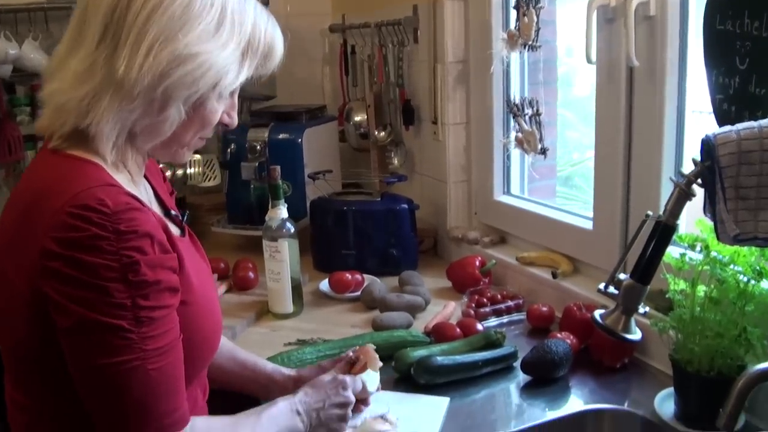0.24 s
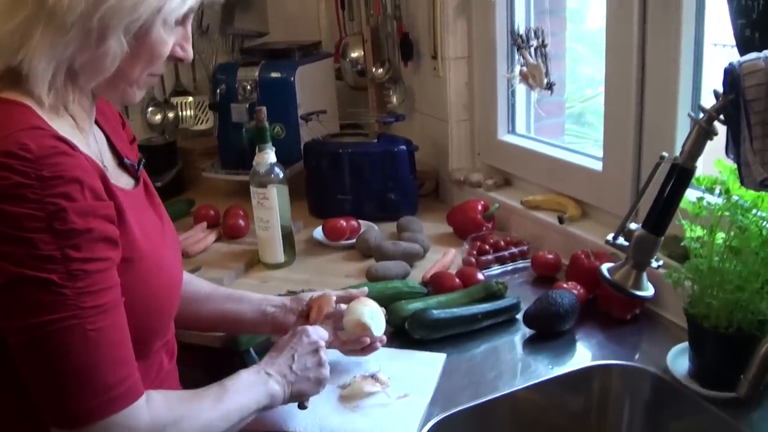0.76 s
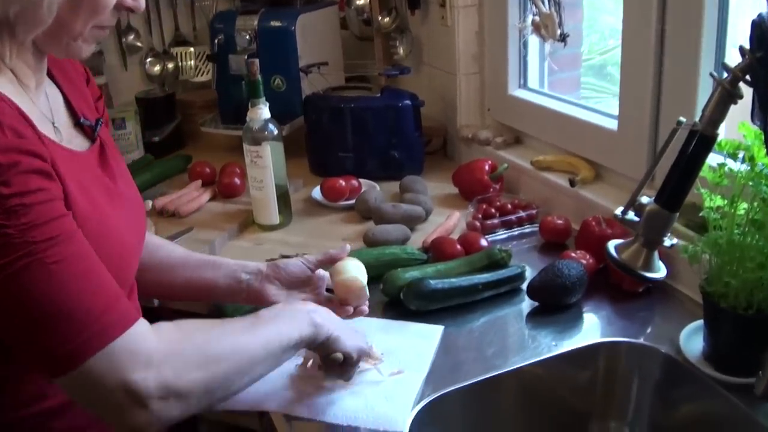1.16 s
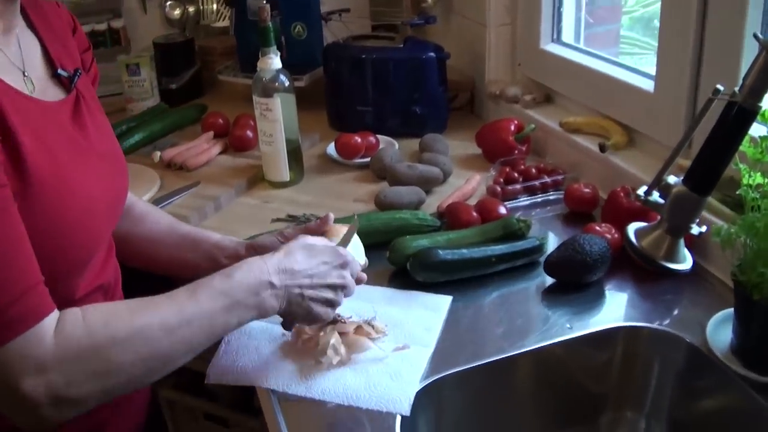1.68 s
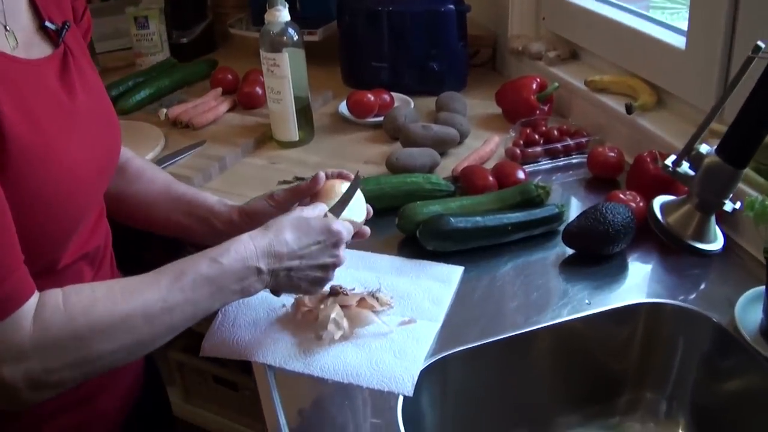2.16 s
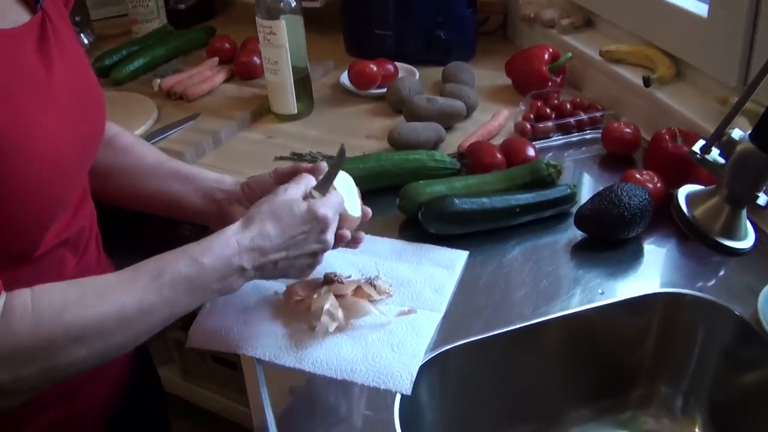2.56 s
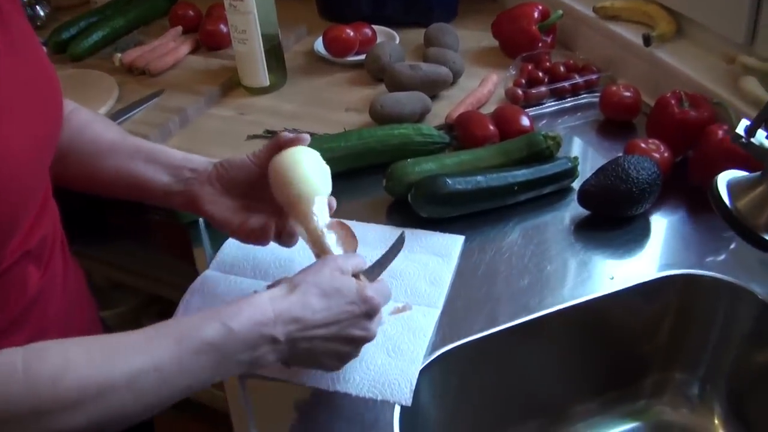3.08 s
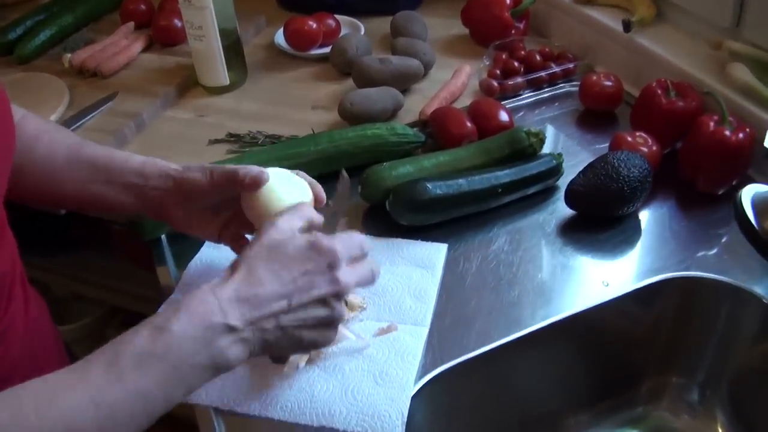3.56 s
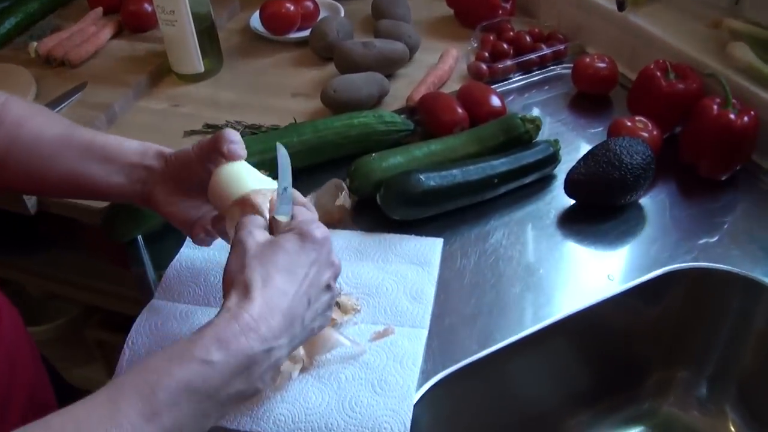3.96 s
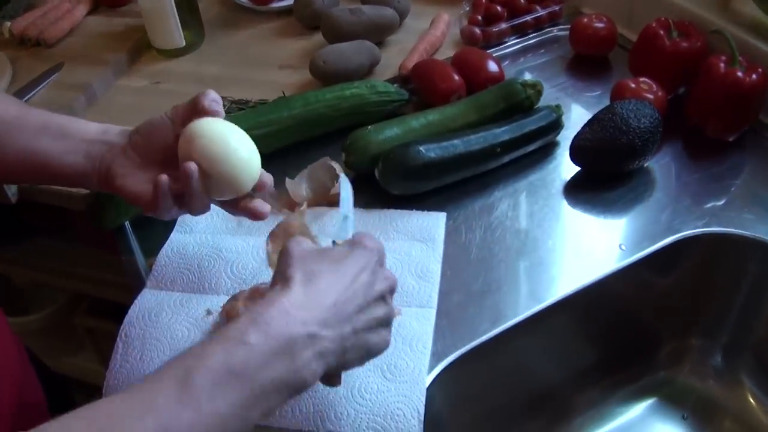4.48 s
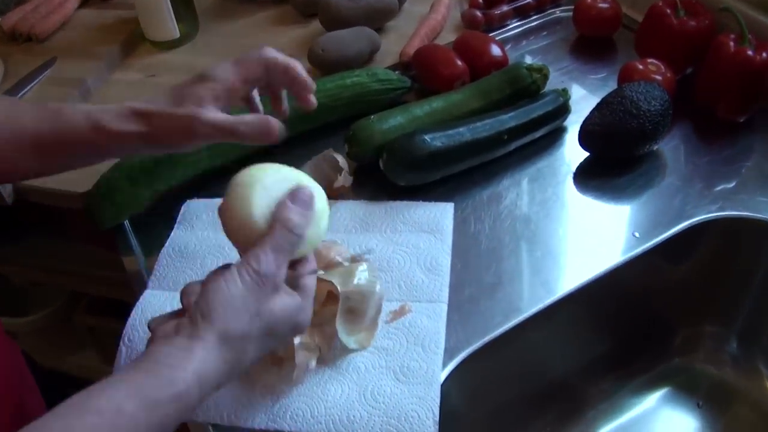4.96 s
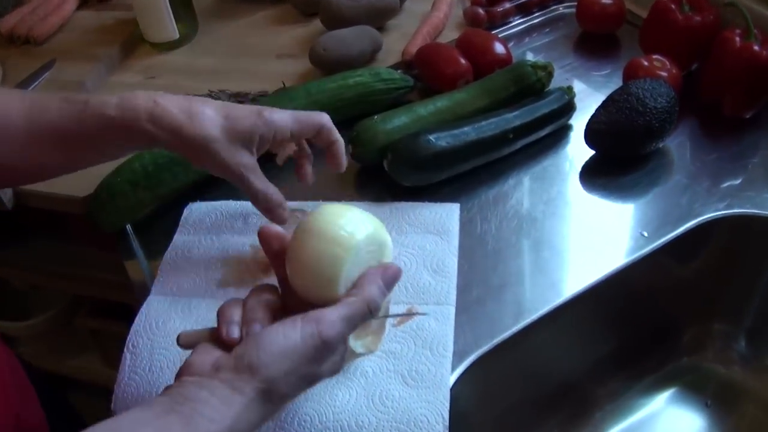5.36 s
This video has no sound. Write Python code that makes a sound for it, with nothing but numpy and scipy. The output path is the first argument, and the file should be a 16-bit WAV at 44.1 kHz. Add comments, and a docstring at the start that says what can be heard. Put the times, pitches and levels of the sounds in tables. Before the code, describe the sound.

Dry, papery onion skin crackles and tears close up in bursts, with sharp little snaps, quiet gaps, and a soft late knock on the worktop.

```python
"""Close to the microphone in a small tiled kitchen, over room rumble, hiss and blurred appliance hums,
dry onion skin tears at once: snaps that ring briefly and free fine crackle, over a papery fibre rustle.
It thins to faint rustling after about 1.4 s, returns loudest between 2.3 and 3.4 s, then thins again.
At 5.2 s a soft bouncing knock sounds the worktop as decaying modes, among the last few snaps.
Sparse echoes from tiles and steel follow the skin and the knock."""
import sys
import numpy as np
from scipy import signal
from scipy.fft import rfft, irfft
from scipy.io import wavfile
from scipy.ndimage import uniform_filter1d

SR = 44100
rng = np.random.default_rng(int(sys.argv[2]) if len(sys.argv) > 2 else 0)


def how_loud(loudness_db):
    """Turn decibels into a plain amplitude multiplier (0 dB gives 1, 20 dB gives 10)."""
    steps = np.asarray(loudness_db, float) / 20
    return 10 ** steps


def int16_out(signal):
    """Quantize to a 16-bit WAV file."""
    q = np.round(np.clip(np.atleast_2d(signal).T, -1, 1) * 32767)
    wavfile.write(sys.argv[1], SR, q.astype(np.int16))


N = 248091  # length in samples

# spectrum of the room rumble and hiss: pitch_hz, density_db (per Hz, relative)
ROOM_AIR = [(12, -6), (20, 4.5), (113, -8.5), (187, -11.5), (255, -23.5), (337, -20), (718, -23),
            (825, -21.5), (1400, -28.5), (2320, -28), (5530, -32.5), (11100, -30.5), (16000, -30)]
# drift of the two appliance hums: time_s, low_hum_db, high_hum_db
HUM_DRIFT = [(0.0, -83, -83), (0.36, -59.5, -54), (0.95, -62.5, -68), (1.66, -69.5, -77), (2.24, -76, -81),
             (2.84, -65.5, -80), (3.35, -64, -102), (3.93, -72, -72.5), (4.89, -66.5, -65.5),
             (5.14, -70.5, -65.5), (5.63, -71, -78.5)]
# pitch of the low and the high hum: pitch_hz, width_hz
HUM_PITCH = [(260, 32), (495, 48)]
# spectrum of the hiss and rumble unlike in the two channels: pitch_hz, density_db (per Hz, relative)
CHANNEL_HISS = [(12, -39), (20, -5), (248, -8), (285, -12), (410, -6.5), (499, -14), (7950, -16),
                (16000, -12.5)]
# decay of the kitchen echoes: pitch_hz, t60_s
KITCHEN_DECAY = [(200, 0.071), (1000, 0.68), (4000, 0.17), (12000, 0.16)]
# contacts of the bouncing knock: start_s, level_db (scales all the modes)
KNOCKS = [(5.167, -38.5), (5.185, -40.5), (5.211, -42)]
# modes of worktop and sink: pitch_hz, level_db (re the knock), t60_s
WORKTOP_MODES = [(109.5, 1.5, 0.28), (134, -1, 0.3), (183, 0, 0.27), (278, -8, 0.24), (356, -6, 0.21),
                 (436, 5, 0.07), (474, -8.5, 0.33), (616, -16, 0.17), (773, -16, 0.18), (1210, -29.5, 0.28)]
# tugs at the skin, each swelling and dying away:
# peak_s, rise_db_per_s, rustle_db, fall_db_per_s, brightness_db_per_octave, hollowness_db
SKIN_TUGS = [(.003, 2000, -28.5, 167, -2, -3), (.061, 3004, -30.5, 198, -0.5, -12),
             (.107, 2500, -34, 170, -1, -9), (0.191, 294, -23.5, 195, -3, -29),
             (.27, 600, -37.5, 100, -2.5, 1), (.347, 3000, -34, 150, 4, -4),
             (.429, 3000, -33, 218, 2.5, -1), (0.461, 3000, -37, 140, 0, 4),
             (.612, 900, -29.5, 130, 0, -6.5), (0.715, 500, -43, 76, -3.5, 3.5),
             (0.978, 1496, -36, 131, -3, -22), (1.084, 350, -41.5, 195, -4.5, 0),
             (1.235, 345, -43, 65, -2, 3), (1.34, 150, -44.5, 90, -2.5, -13), (1.44, 150, -57, 62, -2, -11),
             (2.207, 2500, -50.5, 64, 3, 7), (2.314, 3000, -32.5, 184, -1, -9),
             (2.436, 3000, -38, 27, -0.5, -30), (2.547, 1500, -34, 56, -4.5, -20),
             (2.665, 2002, -26.5, 180, 6.5, -3.5), (2.744, 800, -26, 141, -1, 4.5),
             (2.79, 3000, -31, 205, -1.5, 0.5), (2.916, 400, -27.5, 280, 2.5, 0.5),
             (2.944, 3000, -28, 218, -2, -4.5), (3.054, 3000, -51, 170, 13, -5),
             (3.137, 134, -37.5, 167, 0, 0), (3.228, 3000, -43, 277, 1, 0),
             (3.273, 1499.5, -40, 147, 2.5, 6), (3.341, 2999.5, -43.5, 158, 6, 9),
             (3.573, 896, -49.5, 65, -1, 7), (3.673, 136, -43, 135, -0.5, 3.5),
             (3.86, 200, -55, 51, -5.5, 2), (4.03, 55, -52.5, 79, -2.5, -18),
             (4.255, 450, -56.5, 29.5, -5, -16), (4.371, 146, -37, 320, -3, -3.5),
             (4.505, 800, -66, 22, -17, 0), (4.603, 145, -48.5, 179, 1, 12.5),
             (4.685, 296, -64.5, 120, -2, 6), (4.87, 202, -66.5, 46, -11, -9),
             (5.232, 350, -39.5, 280, -1.5, -7), (5.34, 3000, -50.5, 170, 7, -9),
             (5.4, 2000, -63.5, 77, -13, -9), (5.46, 201, -56.5, 496, -2, -7), (5.559, 2500, -62, 62, 0, 6)]
# spectrum of the rustle: pitch_hz, density_db (per Hz, relative)
SKIN_SPECTRUM = [(88, -38), (150, -33), (354, -24.5), (702, -4.5), (1170, -12.5), (1760, -5), (2760, -10.5),
                 (3420, -0.5), (4080, 1), (11700, 5), (16000, 3.5)]
# steady peaks in the colour of the rustle: pitch_hz, width_hz, level_db (before the hollowness of the tug)
RUSTLE_PEAKS = [(2270, 690, 4.5), (3250, 100, 6.5), (4850, 120, -1)]
# the clearest cracks: start_s, peak_db, flake_pitch_hz, low_push_db (re peak),
# crackle_db (re peak, before the trims in snaps)
CLEAR_SNAPS = [(0.0184, -12.5, 3540, -19.5, -15.5), (0.0583, -8.5, 8570, -20, -18),
               (0.0942, -17.5, 6660, -30, -24), (0.1037, -9.5, 14070, -22, -15.5),
               (0.1486, -15, 9800, -18.5, -21), (0.1584, -13.5, 3600, -20, -12),
               (0.172, -10.5, 12200, -21, -12), (0.1764, -14.5, 12100, -32, -14),
               (0.1864, -8, 6150, -20, -28), (0.2134, -13.5, 7400, -25, -8),
               (0.2254, -10.5, 5900, -14.5, -21), (0.2593, -24.5, 4880, -32, -12),
               (0.2698, -17, 5550, -37, -15), (0.2857, -10.5, 4950, -38, -20),
               (0.3052, -12.5, 5900, -20, -23.5), (0.3441, -8, 5100, -13, -29),
               (0.3534, -14, 13900, -11, -29), (0.3704, -15, 6350, -12, -16),
               (0.3785, -13, 3660, -29, -18.5), (0.4264, -10.5, 4830, -17.5, -25),
               (0.4569, -11, 6970, -16, -16), (0.4668, -12, 12000, -17.5, -19.5),
               (0.4983, -15, 15100, -24, -20.5), (0.5935, -13, 6100, -28, -19),
               (0.6055, -11, 8600, -20.5, -16), (0.6104, -32.5, 12700, -16, 2),
               (0.6534, -12, 13060, -18.5, -16), (0.6739, -19, 2150, -17, -22),
               (0.7128, -22, 2200, -12.5, -9.5), (0.7554, -26, 2120, -14, -13.5),
               (0.9684, -21, 6970, -22, -28), (0.9757, -10, 4840, -23.5, -25),
               (1.0465, -23, 9300, -11, -26), (1.0765, -29.5, 3620, -13, -7), (1.2261, -33, 3470, -31, -28),
               (1.2376, -18.5, 3800, -29, -36), (1.284, -28.5, 7080, -11, -10.5),
               (1.3583, -32, 4250, -36, -34), (1.8173, -33.5, 1870, -21, -18), (1.941, -37, 8060, -32, -15),
               (2.14, -44.5, 1810, -12, -19), (2.1964, -40, 2100, -17, -14),
               (2.2059, -29.5, 12100, -29, -28), (2.2199, -30, 11700, -26.5, -11.5),
               (2.2653, -27.5, 1950, -18, -19.5), (2.2732, -27.5, 1900, -25, -24),
               (2.3082, -18, 14900, -15, -8), (2.3211, -19.5, 1880, -21, -15),
               (2.4344, -20, 5700, -27, -23.5), (2.4907, -23.5, 4290, -48, -8),
               (2.5436, -12, 5000, -42, -27), (2.5591, -15, 4900, -30, -7), (2.5795, -19, 4460, -39, -5.5),
               (2.599, -16, 5910, -36, -13.5), (2.6334, -12.5, 5700, -27, -16),
               (2.6474, -13, 5770, -27, -14.5), (2.6653, -7.5, 11700, -14, -12.5),
               (2.6974, -17, 12300, -30, -12), (2.7354, -11.5, 6250, -17, -17),
               (2.7427, -9.5, 3570, -13.5, -24.5), (2.7896, -2.5, 6200, -45, -24),
               (2.8104, -17.5, 8200, -26, -9), (2.8948, -7.5, 5860, -12, -21),
               (2.9158, -6, 16100, -19, -20.5), (2.9422, -6, 8240, -16, -14.5),
               (2.9464, -5, 13300, -12.5, -20), (3.0525, -21.5, 13400, -17, -18),
               (3.0844, -22, 6300, -26, -17), (3.0989, -30, 12500, -18, -29),
               (3.1323, -22.5, 8270, -33, -13.5), (3.1702, -24, 11300, -20, -22),
               (3.2261, -19, 3230, -27, -19), (3.27, -25, 7900, -29, -11), (3.2799, -21, 14900, -36, -10.5),
               (3.2904, -25.5, 2130, -18, -16), (3.3388, -15.5, 14800, -17, -20.5),
               (3.3892, -35, 12500, -38, -10), (3.5683, -34, 3240, -32, -9),
               (3.8057, -33.5, 4370, -24, -28), (3.8804, -40, 2420, -25, -16),
               (4.0726, -36.5, 2920, -13, -27), (4.1066, -36.5, 7550, -28, -39),
               (4.3256, -22.5, 4240, -18, -26), (4.361, -21.5, 2070, -15, -13),
               (4.3884, -31, 1750, -28, -33), (4.6029, -21.5, 7140, -23, -19),
               (4.6844, -38, 3500, -17, -19), (5.1941, -27.5, 1770, -18, -15.5),
               (5.227, -19, 4530, -24, -19.5), (5.2989, -31.5, 1950, -22, -27),
               (5.3393, -21, 6800, -13.5, -19.5), (5.3971, -26.5, 4420, -18.5, -21.5),
               (5.5707, -41.5, 3630, -18, -12.5)]


def evened(x):
    """Scales to rms 1."""
    return x / np.sqrt(np.mean(x ** 2) + 1e-20)


def read(points, hz):
    """Looks up a table by pitch on a log-frequency axis."""
    f, value = np.transpose(points)
    return np.interp(np.log(hz + 1), np.log(f + 1), value)


def add(mix, start_s, sound):
    """Mixes a sound in at start_s, cut off at the end of the mix."""
    part = mix[max(round(start_s * SR), 0):][:len(sound)]
    part += sound[:len(part)]


def coloured_noise(points):
    """White noise filtered to the spectrum of a table."""
    size = 2 ** 18
    spectrum = rfft(rng.standard_normal(N), size)
    return irfft(spectrum * how_loud(read(points, np.fft.rfftfreq(size, 1 / SR))))[:N]


def resonate(x, hz, width_hz):
    """A resonance of gain 1: shifts pitch hz down to zero, smooths, and shifts back."""
    turn = np.exp(2j * np.pi * np.cumsum(hz * np.ones(len(x))) / SR)
    r = np.exp(-np.pi * width_hz / SR)
    return 2 * (turn * signal.lfilter([1 - r], [1, -r], x / turn)).real


def background():
    """Room rumble and hiss as shaped noise, with two appliance hums as narrow noise that come and go."""
    out = how_loud(-58) * evened(coloured_noise(ROOM_AIR))
    time_s, *levels = np.transpose(HUM_DRIFT)
    for (hz, width_hz), level_db in zip(HUM_PITCH, levels):
        hum = evened(resonate(rng.standard_normal(N), hz, width_hz))
        out += how_loud(np.interp(np.arange(N) / SR, time_s, level_db)) * hum
    return out


def kitchen(x):
    """Sparse echoes of random sign from tiles and steel, each band dying at its own speed."""
    taps = np.zeros(SR // 2)
    at = np.arange(120, len(taps) - 20, 20)  # one echo in every 20 samples
    taps[at + rng.integers(0, 20, len(at))] = rng.choice([-1., 1.], len(at))
    hz, t, bands = signal.stft(taps, SR, nperseg=128)
    decay = how_loud(-60 * t / read(KITCHEN_DECAY, hz)[:, None])
    tail = signal.istft(bands * decay, SR, nperseg=128)[1]
    return signal.oaconvolve(x, tail / np.linalg.norm(tail))[:N]


def bump():
    """A soft bouncing knock sets worktop and sink modes sounding, with a dull scuff from the first contact."""
    out, t = np.zeros(N), np.arange(SR // 2) / SR
    phases = rng.random((len(KNOCKS), len(WORKTOP_MODES)))
    for (start_s, level_db), phase in zip(KNOCKS, phases):
        modes = np.zeros(len(t))
        for (hz, mode_db, t60_s), p in zip(WORKTOP_MODES, phase):
            modes += how_loud(mode_db - 60 * t / t60_s) * np.sin(2 * np.pi * (hz * t + p))
        soft_start = 1 - np.exp(-t / 0.0019)
        add(out, start_s, how_loud(level_db) * modes * soft_start)
    # a dull scuffing noise starts with the first contact and dies away
    scuff = evened(coloured_noise([(80, -20), (200, 1), (700, -5.5), (2500, -24), (8000, -39)]))
    add(out, KNOCKS[0][0], how_loud(-42.5 - 60 * t / 0.47) * scuff[:len(t)])
    return out


def pulls():
    """Rustle level, brightness and hollowness: tug powers add, the colour is their power-weighted average."""
    peak_s, rise, rustle_db, fall, bright_db, hollow_db = np.transpose(SKIN_TUGS)[:, :, None]
    since = np.arange(0, N + 32, 32) / SR - peak_s  # one point every 32 samples
    slope = np.where(since < 0, rise, fall)
    power = how_loud(rustle_db - abs(since * slope)) ** 2 + 1e-30
    total = power.sum(0)
    curves = [10 * np.log10(total)]
    curves += [(power * colour).sum(0) / total for colour in (bright_db, hollow_db)]
    return [np.interp(np.arange(N), np.arange(len(c)) * 32, c) for c in curves]


def ring(hz, cycles, size=400):
    """A damped ring with a soft start; its amplitude falls to about a third in the given cycles."""
    turns = np.arange(size) / SR * hz
    return np.sin(2 * np.pi * turns) * np.exp(-turns / cycles) * (1 - np.exp(-turns / .45))


def rustle(level_db, bright_db, hollow_db, freed, count=28):
    """Thousands of tiny fibre breaks, clumped and of uneven size, each a few cycles at its own pitch."""
    creases = how_loud(4. * np.minimum(rng.standard_exponential(N), 2.2))
    creases *= rng.random(N) < 150 / SR  # 150 per second
    # small creases give way all at once
    clumps = 1 + signal.oaconvolve(creases, np.exp(-np.arange(200) / SR / .0009))[:N]
    grains = np.zeros(N)
    for hz in np.geomspace(200, 15800, count):
        sizes = how_loud(0.55 * np.minimum(rng.standard_exponential(N), 4)) * rng.choice([-1., 1.], N)
        # flakes of one size come in patches
        sizes *= how_loud(1.37 * evened(uniform_filter1d(rng.standard_normal(N), 1500)))
        per_s = 150 + .35 * hz  # finer fibres break more often; clumps change only their size
        breaks = sizes * (rng.random(N) < per_s / SR) * clumps
        grain = ring(hz, 1.58, size=1500)
        tilt_db = bright_db * np.log2(max(hz, 1100) / 6500)
        weight = how_loud(read(SKIN_SPECTRUM, hz) + tilt_db) * np.sqrt(hz / per_s) / np.linalg.norm(grain)
        grains += signal.oaconvolve(breaks * weight, grain)[:N]
    # the peaks wander slightly in pitch
    shifting = 1 + 0.016 * evened(uniform_filter1d(rng.standard_normal(N), 4000))
    peaked = np.zeros(N)
    for hz, width_hz, db in RUSTLE_PEAKS:
        peaked += how_loud(db) * resonate(grains, hz * shifting, width_hz)
    return evened(grains + how_loud(hollow_db) * peaked) * np.sqrt(how_loud(level_db) ** 2 + freed)


def small_snaps(level_db, count=180):
    """Minor cracks fall at random moments, their strength following the rustle around them."""
    when, size, pitch = rng.random((count, 3)).T
    at = (when * (N - 1)).astype(int)
    peak_db = level_db[at] + 6.5 - 3 * np.log(np.maximum(size, .05))
    flake_hz = 1800 * 7.5 ** pitch
    # low push -17 dB and crackle -16 dB, columns as in CLEAR_SNAPS
    return [(s, db, hz, -17, -16) for s, db, hz in zip(at / SR, peak_db, flake_hz)]


def snaps(rows):
    """Each crack: a wide tick, flake and side rings, a low push; also the crackle power it frees."""
    out, freed, t = np.zeros(N), np.zeros(N), np.arange(4000) / SR
    early = t[:400]
    tick_shape = np.exp(-early / .0006) * (1 - np.exp(-early / .0002))
    # the fracture itself is one sharp kink
    since = early - .0003
    kink = np.exp(-(since / .00005) ** 2) * np.cos(2 * np.pi * 4500 * since)
    chances = rng.random((len(rows), 4))
    noises = rng.standard_normal((len(rows), 4000))
    for (start_s, peak_db, hz, push_db, crackle_db), chance, noise in zip(rows, chances, noises):
        cycles = .0006 * hz + 1.3  # higher flakes ring for more cycles
        crack = ring(hz, cycles) + how_loud(3) * noise[:400] * tick_shape
        side_rings = ring(2000 + 4000 * chance[0], 0.63) + ring(7000 + 7000 * chance[1], 5.4)
        crack += how_loud(-28.5) * side_rings - kink
        crack -= 0.65 * uniform_filter1d(crack, size=21)  # thin skin radiates little bass
        crack /= abs(crack).max()
        push = ring(350 + 700 * chance[2], 0.39) + 0.23 * ring(70 + 200 * chance[3], 0.39)
        push /= abs(push).max()
        add(out, start_s + .0007, how_loud(peak_db) * (crack + how_loud(push_db) * push))
        # the flake keeps trembling at its pitch
        chatter = evened(signal.oaconvolve(noise[::-1], ring(hz, 4.0))[:4000])
        add(out, start_s + .002, how_loud(peak_db + crackle_db - 6.5) * chatter * np.exp(-t / 0.014))
        add(freed, start_s + 0.003, how_loud(peak_db + crackle_db) ** 2 * 0.97 * np.exp(-t / 0.0058))
    return out, freed


def scene():
    """The skin, the bump and their echoes over the background, the same in both channels."""
    level_db, bright_db, hollow_db = pulls()
    cracks, freed = snaps(list(CLEAR_SNAPS) + small_snaps(level_db))
    skin = cracks + rustle(level_db, bright_db, hollow_db, freed)
    knock = bump()
    echoes = how_loud(-12.5) * kitchen(skin + knock)
    mid = skin + echoes + knock + background()
    return np.array([mid, mid])


def top_cut(x):
    """Nothing passes above the cut-off."""
    return signal.sosfilt(signal.butter(12, 16810, fs=SR, output="sos"), x)


def record(dry):
    """Adds a faint steady hiss of opposite sign in the two channels, then limits the band."""
    side = how_loud(-73) * evened(coloured_noise(CHANNEL_HISS))
    heard = dry + np.array([side, -side])
    low_pass = signal.firwin(255, 15800, window=("kaiser", 8), fs=SR)
    mix = signal.oaconvolve(heard, low_pass[None], "same")
    return top_cut(mix)


dry = scene()
out = record(dry)
int16_out(out)
```